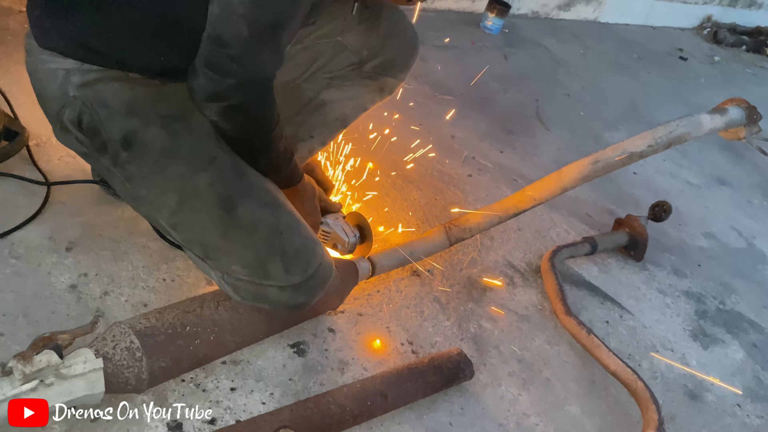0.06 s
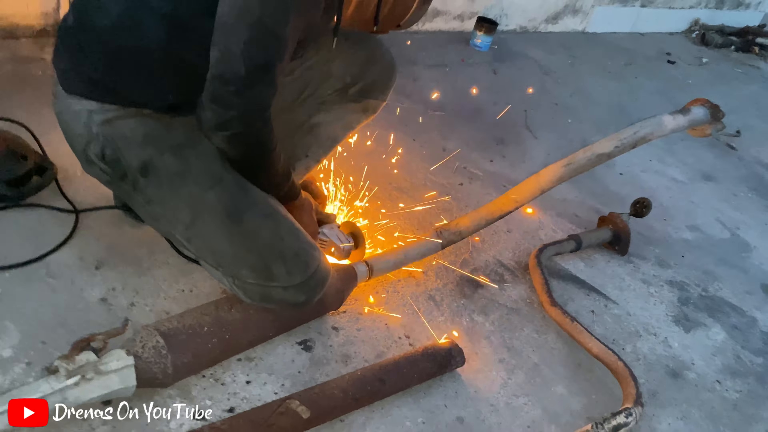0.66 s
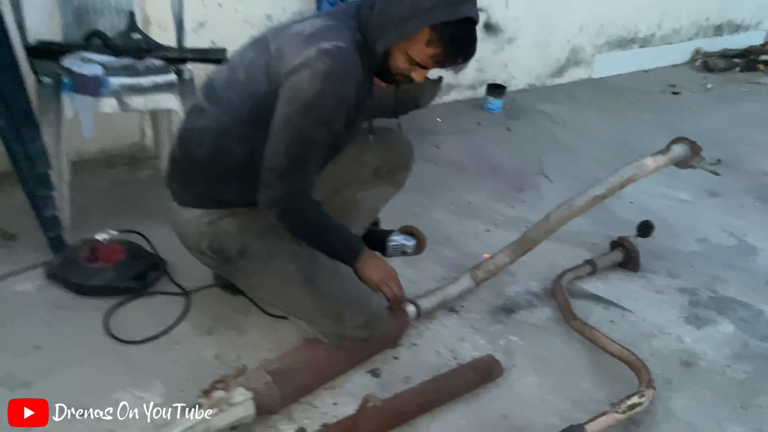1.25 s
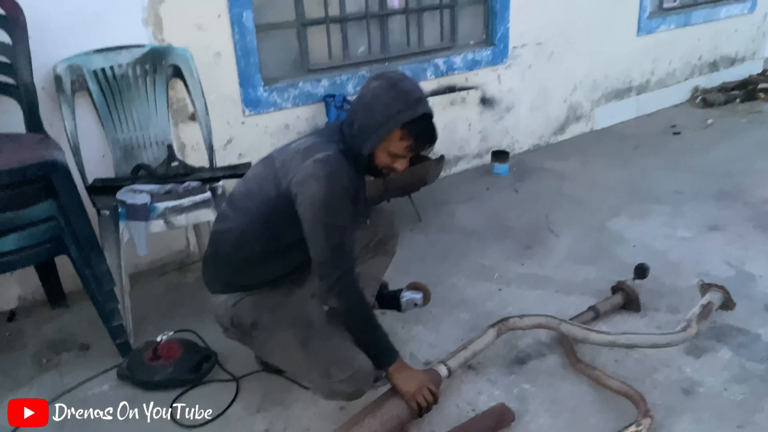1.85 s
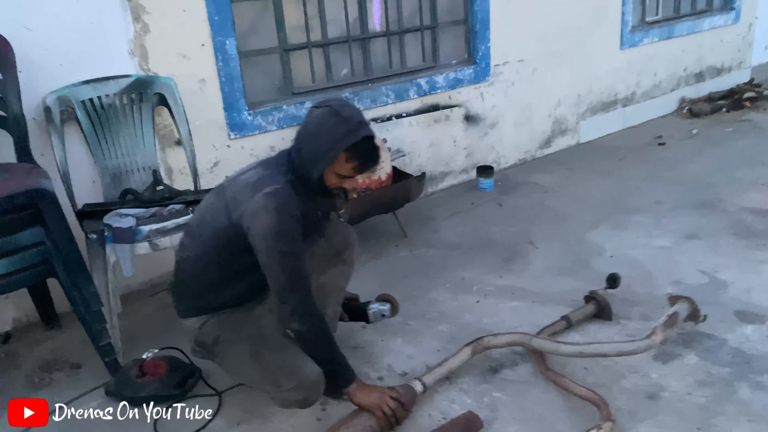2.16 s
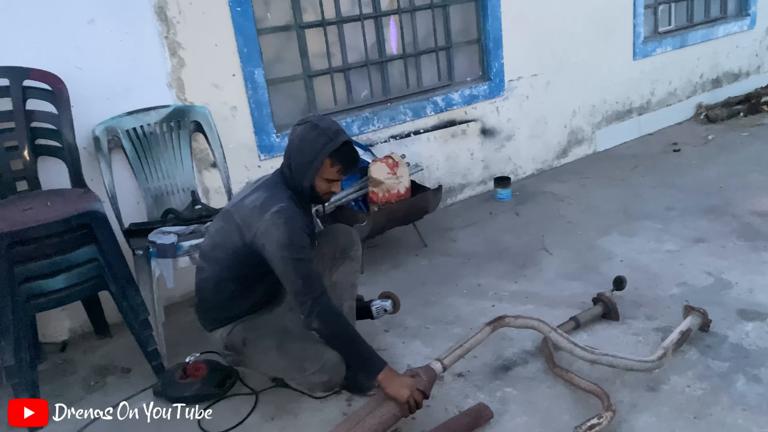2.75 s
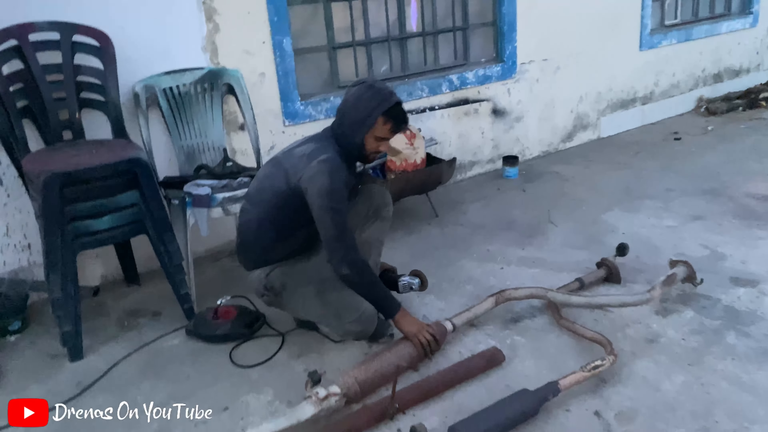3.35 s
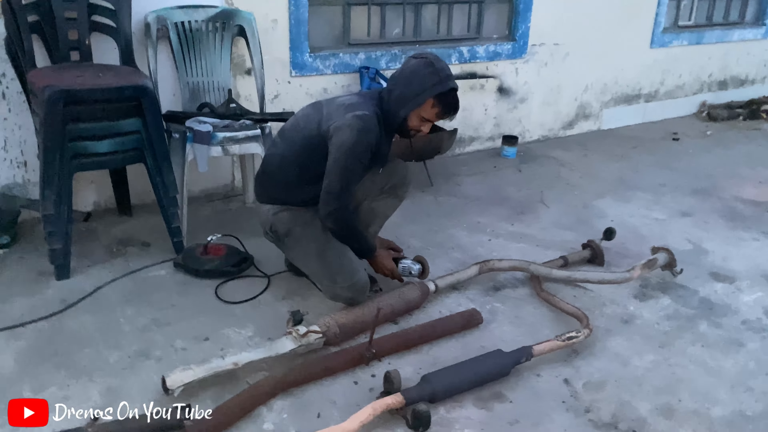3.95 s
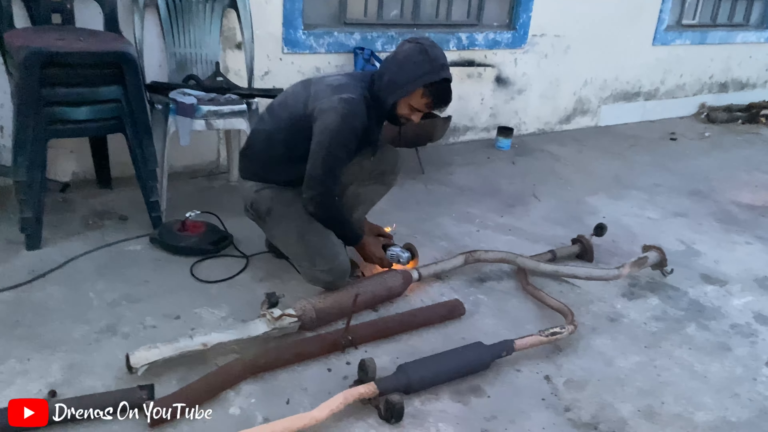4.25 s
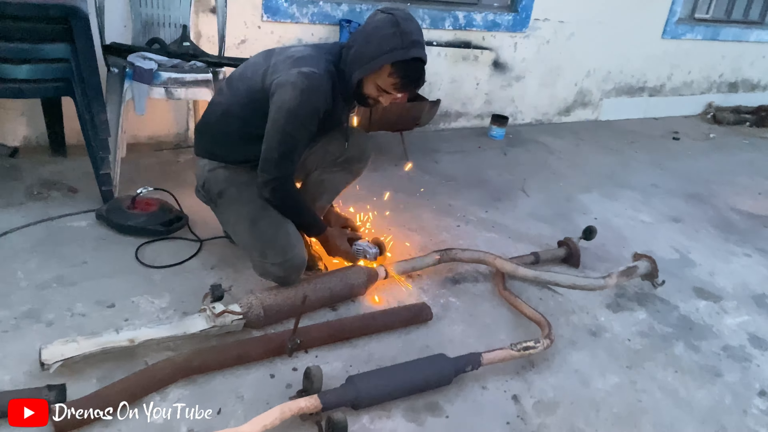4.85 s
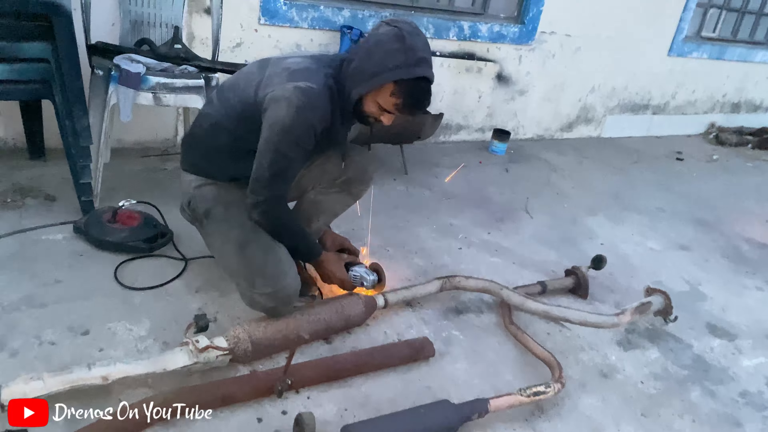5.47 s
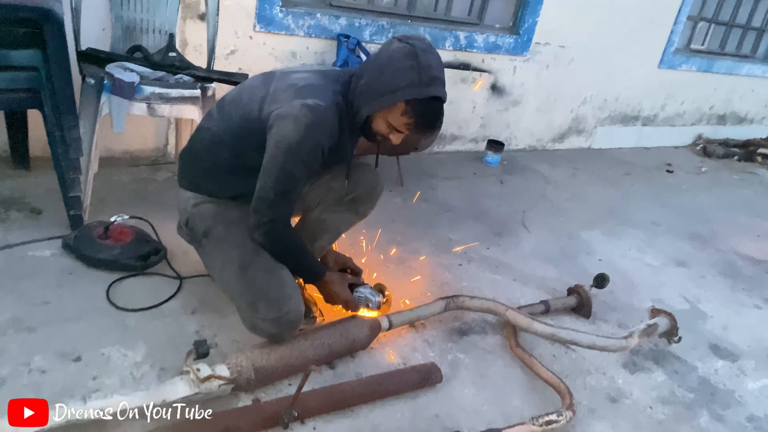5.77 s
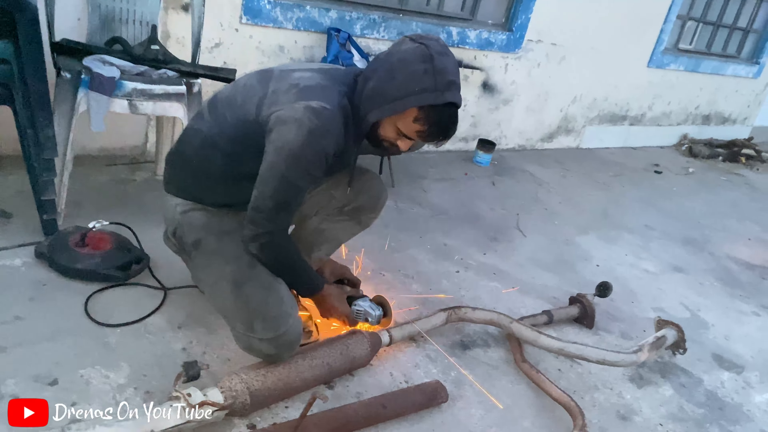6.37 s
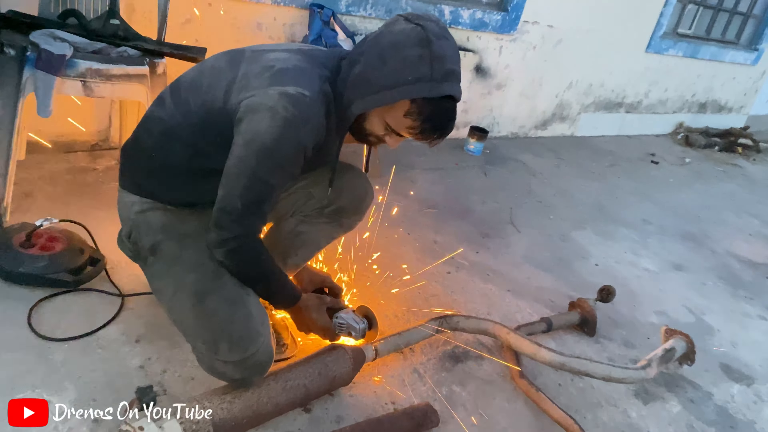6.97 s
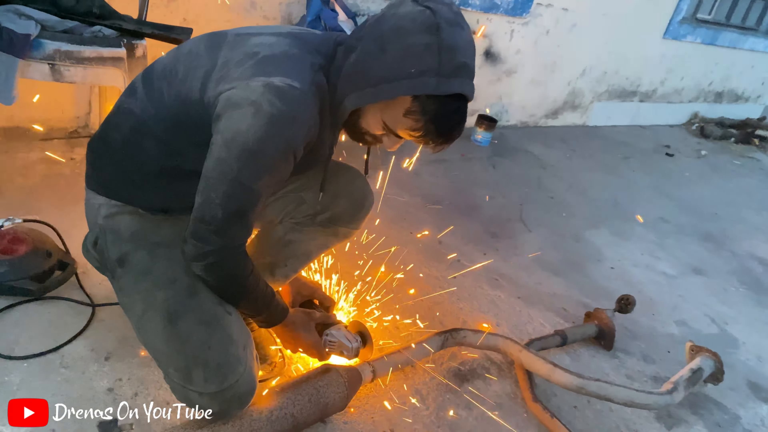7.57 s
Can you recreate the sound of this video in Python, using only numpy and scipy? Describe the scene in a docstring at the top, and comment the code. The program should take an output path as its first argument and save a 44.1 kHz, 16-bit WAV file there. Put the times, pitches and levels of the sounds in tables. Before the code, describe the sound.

An angle grinder rasps into a steel pipe with a hiss of sparks, then lifts off and runs up to a high whine. Meanwhile the pipe scrapes over concrete with a few clinks and soft bumps. The disc grazes the metal in short, crackling bursts, then bites in hard, squealing as the motor sags. It is heard in an outdoor yard, a few steps from a hand-held phone with faint wind rumble.

```python
"""An angle grinder bites into a steel exhaust pipe, its grit ringing the metal under a hiss of sparks.
The disc leaves the cut and the motor runs up, fan rushing and gears whining, while the pipe is dragged
round on the concrete yard and set down with clinks and soft bumps. The disc grazes the pipe twice,
then bites in again and the motor sags under the load. A hand-held phone listens a few steps away:
reflections off floor and wall shift as it moves, and light air rumbles on its microphone."""
import sys
import numpy as np
from scipy import signal
from scipy.fft import rfft, irfft, next_fast_len
from scipy.io import wavfile
from scipy.ndimage import uniform_filter1d, map_coordinates

SR = 44100
rng = np.random.default_rng(int(sys.argv[2]) if len(sys.argv) > 2 else 0)


def to_wav(s):
    """Save 16-bit WAV."""
    ch = np.atleast_2d(s).T  # columns
    pcm = np.round(np.clip(ch, -1, 1) * 32767)  # PCM
    wavfile.write(sys.argv[1], SR, pcm.astype(np.int16))


N = 336042
TIME = np.arange(N) / SR
PADDED = next_fast_len(N + SR // 4, real=True)
HZ = np.fft.rfftfreq(PADDED, 1 / SR)
GEAR_RATIO = .305  # disc turns per shaft turn
DIRECT_ONLY = np.array([[1], [0]])  # a source has two rows: direct sound and scattered sound


# Grit noise on the thin tube and beside the muffler. Each row: frequency in Hz, relative density in dB.
TUBE_SPECTRUM = [(40, -42), (120, -16), (280, -18.5), (400, -12.5), (780, -16.5), (1200, -1), (2500, 2),
                 (4300, 2), (5500, 1), (8500, -17), (11500, -18), (15000, -30.5)]
MUFFLER_SPECTRUM = [(40, -25), (130, -19.5), (220, -25.5), (450, -24), (1000, -7), (1600, -0.5), (3500, 5),
                    (5500, -1.5), (7000, -9.5), (8500, -14.5), (11500, -17), (15000, -37)]
# Modes of the steel at each place. Each row: frequency in Hz, width in Hz, height over the grit in dB.
TUBE_RESONANCES = [(364.5, 16, 28), (448, 40, 22.5), (513, 15, 20), (620, 160, 20.5), (918, 20, 23.5),
                   (1019, 20, 25.5), (1052, 16, 22), (1252, 17, 26.5), (1292, 14, 22.5), (1330, 20, 18),
                   (1452, 20, 24), (1494, 18, 19.5), (1630, 18, 19.5), (1671, 18, 28.5), (1885, 41, 12),
                   (2075, 83, 12.5), (2450, 260, 11.5), (3350, 320, 8.5), (3726, 48, 17.5)]
MUFFLER_RESONANCES = [(139, 10, 15), (332, 55, 23.5), (459.5, 14.6, 31.3), (634, 136, 17), (778, 12, 20.3),
                      (1211, 21, 18.5), (1460, 28, 6.8), (1861, 23, 13.7), (2240, 170, 10.7),
                      (2492, 59, 13.5), (4170, 150, 3), (6270, 450, 6.3), (7460, 200, 1.7),
                      (11030, 94, 5.6)]
# The disc's periodic thrust. Each row: multiple of the disc rate, relative level in dB.
THRUST_HARMONICS = [(1, -29), (2, -32), (3, -29), (4, -34), (5, -17), (6, -26.5), (8, -20.5)]

def cut(angle, stroke, spectrum, modes, grind_db, hiss_db, thrust_db, split_hz=4800, skid_rad=0.41):
    """Forced vibration: grit drives the pipe's modes, with thrust buzzing below and sparks hissing above."""
    grind, hiss, chatter_db = stroke
    steel = resonator(spectrum, modes)
    lowpass = 1 / (1 + (HZ / split_hz) ** 10)
    disc_angle = GEAR_RATIO * angle + skid_rad * wobble(30)
    force = contact_force(disc_angle, chatter_db)
    grinding = unit(filtered(grit(grain_db=0) * force, steel * lowpass))
    sparks = unit(filtered(grit(grain_db=2.5) * force, steel * (1 - lowpass)))
    buzz = partials(disc_angle, THRUST_HARMONICS, flutter_db=3.7, flutter_rate=20)
    return grind * (amp(grind_db) * grinding + amp(thrust_db) * buzz) + hiss * amp(hiss_db) * sparks


# Strokes of the disc at each place. Each row: touch, lift-off, time to bite in and time to ease off
# in seconds, then relative levels of grinding, spark hiss and the flare at lift-off in dB.
TUBE_STROKES = [(-0.33, 0.96, 0.5, 0.22, -21.5, -32, -35.5)]
MUFFLER_STROKES = [(4.5, 4.66, .06, 0.094, -45, -37.5, -55),
                   (4.63, 4.972, 0.15, 0.072, -32.5, -39.5, -34.5),
                   (5.36, 5.965, 0.22, 0.032, -32, -37, -33), (6.03, 7.9, 1.02, .1, -20.5, -26.5, -60)]

def strokes(rows, kerf_after_s=1.05, sink_s=0.4, kerf_db=-5.5, trail_db=-10.5, trail_s=0.27):
    """Abrasion follows pressure: each stroke sets the grinding gain, hiss gain and chatter depth in dB."""
    grind, hiss, chatter_db = np.zeros((3, N))
    parting_s = 0.019
    for touch, lift, bite, ease, grind_db, hiss_db, flare_db in rows:
        bitten = ramp((TIME - touch) / bite)
        pressure = bitten * ramp((lift - TIME) / ease)
        sunk = ramp((TIME - touch - kerf_after_s) / sink_s)  # a sunken disc throws fewer sparks clear
        grind += pressure * amp(grind_db)
        # Sparks flare just before lift-off and leave a trail in the air.
        flare = bell(lift - 0.046, 0.051) * ramp((lift - TIME) / parting_s)
        trail = amp(trail_db) * (TIME > lift - parting_s) * np.exp(-np.abs(TIME - lift) / trail_s)
        hiss += pressure ** 0.81 * amp(hiss_db + kerf_db * sunk) + amp(flare_db) * (flare + trail)
        # The disc hammers more when skimming or bound in the kerf.
        chatter_db += (pressure > 0) * (.5 + 3.5 * (1 - bitten) + 2.5 * sunk)
    return grind, hiss, chatter_db


def contact_force(disc_angle, chatter_db, snag_share=.1, snag_db=6.5, rough_db=2.0, sway_db=0.83):
    """Amplitude modulation: force peaks as the disc's high spot comes round, and on some turns it snags."""
    high_spot = np.cos(disc_angle) + 0.28 * np.cos(2 * disc_angle)
    turn = np.abs(np.round(disc_angle / (2 * np.pi))).astype(int)
    snags = (rng.random(N)[turn] < snag_share) * np.exp(6 * (np.cos(disc_angle) - 1))
    force = amp(chatter_db * high_spot + snag_db * snags + rough_db * np.tanh(wobble(190)))
    running_rms = np.sqrt(np.abs(uniform_filter1d(force ** 2, size=SR // 12)))
    return force / running_rms * amp(sway_db * wobble(30))


# The disc sets the cut edge squealing. Each row: peak time in seconds, level in dB,
# frequency and width in Hz, half-length in seconds, glide in Hz per second, pulsing in dB.
EDGE_SQUEALS = [(.69, -32, 3720, 110, .07, 700, 4), (.885, -30, 3660, 170, .03, 900, 6),
                (.935, -31, 3720, 230, .014, 0, 9), (.97, -43, 3720, 260, .05, 0, 5),
                (4.79, -35, 1560, 200, .047, 0, 4), (4.86, -33, 3600, 367, .025, 0, 6),
                (5.7, -29, 2270, 280, .056, 0, 4), (5.69, -47, 10750, 250, .04, 0, 8),
                (5.9, -34, 6400, 300, .04, -1500, 3), (6.555, -26.5, 2480, 110, .011, 0, 3),
                (6.72, -32, 2470, 110, .08, 0, 2), (6.79, -32, 1650, 160, .04, 0, 3),
                (6.8, -34, 5900, 300, .15, -1100, 3), (6.99, -26, 2370, 200, .12, 0, 2),
                (7.005, -23, 2320, 190, .03, 0, 3), (7.14, -26.5, 2380, 220, .025, 0, 4),
                (7.12, -26.5, 4200, 260, .018, -400, 7), (7.24, -28.5, 4200, 300, .04, -400, 8),
                (7.42, -29.5, 4100, 260, .035, -600, 9), (7.57, -30.5, 4000, 260, .03, -600, 9),
                (7.388, -24, 3380, 120, .005, 0, 3), (7.3, -33, 3450, 180, .035, -400, 7),
                (7.59, -30, 3330, 160, .035, -400, 8)]
# Narrow bands swell and glide in the motor's rush as reflections shift. Each row: as for the squeals.
RUSH_BANDS = [(1.25, -49, 1230, 70, .09, 250, 1), (1.53, -46.5, 2580, 130, .08, 0, 1),
              (2.2, -41.5, 2660, 140, .09, 600, 1), (2.85, -43, 3450, 180, .2, 100, 1),
              (3.95, -41.5, 2490, 150, .13, 0, 1), (4.15, -45, 5180, 200, .15, -1300, 1),
              (4.24, -39, 2760, 170, .08, -500, 1), (4.3, -40, 3760, 330, .11, -900, 1),
              (5.1, -39, 3200, 200, .15, -200, 1), (5.35, -39.5, 2580, 160, .24, 0, 1),
              (6.2, -39, 3520, 180, .12, -700, 1)]

def singing(rows, angle):
    """Narrow-band noise has a wavering pitch: each band swells, glides and pulses once per disc turn."""
    out = np.zeros((2, N))
    for s, db, hz, width_hz, length, glide, pulse_db in rows:
        near = np.abs(TIME - s) < 4 * length
        t = TIME[near] - s
        lowpass = signal.butter(2, width_hz / 2, fs=SR, output="sos")
        waver = signal.sosfilt(lowpass, rng.standard_normal((2, 2, 2 * SR)))
        in_phase, quadrature = unit(waver)[..., -len(t):]
        phase = 2 * np.pi * (hz * t + glide * t ** 2 / 2)
        band = in_phase * np.cos(phase) + quadrature * np.sin(phase)
        pulses = unit(amp(pulse_db * np.cos(GEAR_RATIO * angle[near])))
        out[:, near] += amp(db) * bell(s, length)[near] * pulses * band
    return out


# The rim catches hard on the steel. Each row: start in seconds, relative level in dB.
RIM_CATCHES = [(.768, -20), (0.78, -19), (0.791, -21), (1.01, -34), (1.028, -31), (4.179, -26),
               (4.567, -26), (4.719, -22.5), (4.7992, -17.5), (4.866, -21), (4.9004, -18), (5.482, -26),
               (5.514, -24), (5.5512, -19.5), (5.6056, -21), (5.6391, -21), (5.722, -20), (5.7884, -25),
               (5.89, -22), (6.949, -17), (7.109, -20), (7.128, -17.5), (7.208, -16.5), (7.224, -20),
               (7.277, -18)]
# Colour of a catch. Each row: frequency in Hz, relative density in dB.
CATCH_SPECTRUM = [(40, -43), (900, -17), (2000, -1.5), (4200, -1), (5200, -12), (8000, -14), (15000, -30)]
# Modes of the cut edge. Each row: frequency in Hz, width in Hz, height in dB.
EDGE_RESONANCES = [(2580, 300, 4), (3350, 200, 5), (3760, 660, 7)]

def catches(gain_db=2, decay_s=0.0027):
    """Impulse excitation: each catch is a crack of a few milliseconds that rings the cut edge."""
    bursts, t = np.zeros(N + SR), TIME[:SR // 32]
    for s, db in RIM_CATCHES:
        bursts[round(s * SR):][:len(t)] += amp(db) * np.exp(-t / decay_s)
    edge = resonator(CATCH_SPECTRUM, EDGE_RESONANCES)
    edge /= np.sqrt(np.mean(np.abs(edge) ** 2))
    return amp(gain_db) * filtered(bursts[:N] * rng.standard_normal((2, N)), edge)


# Loudness of fan and gears. Each row: time in seconds, relative level in dB.
MOTOR_LEVEL = [(1.05, -42.5), (1.3, -42.5), (1.46, -40.5), (2.08, -38), (2.84, -38), (3.44, -38.5),
               (4.02, -35.5), (4.69, -34), (5.47, -34), (5.68, -31), (5.78, -30.5), (5.93, -32.5),
               (6.2, -32.5)]
# Rush of the cooling fan. Each row: frequency in Hz, relative density in dB.
FAN_SPECTRUM = [(40, -20.5), (130, -20.5), (250, -13.5), (400, -12.5), (700, -11.5), (1100, -0.5),
                (2000, 2), (3000, 1), (4300, -3), (5200, -7), (7000, -15.5), (8800, -24), (11500, -23.5),
                (15000, -38)]
# Resonance of the casing. Each row: frequency in Hz, width in Hz, height over the rush in dB.
CASING_RESONANCE = [(5220, 200, 2)]
# Tones of the drive. Each row: multiple of the shaft rate, relative level in dB.
SHAFT_ORDERS = [(.8, -40), (1, -26), (2, -28.5), (3, -20), (15, -40), (31, -40)]
# The tones beam toward the phone or away as the tool turns. Each row: time in seconds, gain in dB.
DIRECTIVITY = [(1, 1), (1.5, 4.5), (2.2, 6), (3.1, -1.5), (3.8, -10), (4.4, 1.5), (4.9, 4.5), (6, -0.5),
               (6.85, 7), (7.62, 2)]

def motor(angle, load, rush_db=3, whine_db=3, strain_db=0.5, mains_hz=50):
    """Rotating machine noise: shaft orders whine over a rush modulated by gear rattle and torque ripple."""
    ripple_db = 0.55 * np.cos(2 * np.pi * 2 * mains_hz * TIME)
    rattle = amp(0.86 * wobble(220) + 0.1 * np.cos(GEAR_RATIO * angle) + ripple_db + 0.83 * wobble(20.94))
    rush = unit(filtered(grit(grain_db=0.5) * rattle, resonator(FAN_SPECTRUM, CASING_RESONANCE)))
    whine = partials(angle, SHAFT_ORDERS, flutter_db=2, flutter_rate=12)
    level = amp(curves(MOTOR_LEVEL)[0] + strain_db * load)
    return level * (amp(rush_db) * rush + amp(whine_db + curves(DIRECTIVITY)[0]) * whine)


# The motor sags in the cuts and runs up between. Each row: time in seconds, shaft turns per second.
SHAFT_SPEED = [(0, 386), (.3, 347), (.6, 440), (.98, 355), (1.15, 410), (1.42, 451), (1.75, 478),
               (2.35, 501), (3.2, 509), (4.72, 509), (4.9, 484), (5, 493), (5.45, 504), (5.94, 488),
               (6.25, 496), (6.6, 487), (6.98, 434), (7.25, 386)]

def shaft_angle(waver=0.00083):
    """Phase is the integral of frequency: the slightly wavering speed sums to an angle in radians."""
    speed = curves(SHAFT_SPEED)[0] * (1 + waver * wobble(14))
    return 2 * np.pi * np.cumsum(speed) / SR


# Shoves of the pipe over the concrete. Each row: start in seconds, length in seconds, level in dB.
SHOVES = [(1.833, .12, -31.5), (1.872, 0.033, -22), (2.009, 0.081, -31), (2.122, 0.1, -38),
          (2.38, 0.13, -35.5), (3.06, 0.039, -37.5)]
# Colour of the scrape. Each row: frequency in Hz, relative density in dB.
SCRAPE_SPECTRUM = [(40, -23), (150, -17), (500, -8.5), (900, -3.5), (1400, 2), (2400, -5), (4000, -8.5),
                   (7000, -20.5), (12000, -35), (15000, -48)]
# Modes of the dragged pipe. Each row: frequency in Hz, width in Hz, height over the scrape in dB.
PIPE_RESONANCES = [(1040, 21, 8), (1356, 54, 9.5), (1533, 49, 7), (1770, 56, 3), (2050, 31, 11),
                   (2320, 58, 10), (2700, 36, 8), (3140, 29, -1), (5000, 110, 14)]

def dragging(attack_s=.017, release_s=.01, slip_db=1.3):
    """Stick-slip friction: rough concrete rings the pipe as each shove rises, holds and dies away."""
    shoves = np.zeros(N)
    for s, length, db in SHOVES:
        release = np.exp(-np.maximum(TIME - s - length, 0) / release_s)
        shoves += amp(db) * ramp((TIME - s) / attack_s) * release
    slips = grit(grain_db=-3.0) * amp(slip_db * wobble(260))
    return shoves * unit(filtered(slips, resonator(SCRAPE_SPECTRUM, PIPE_RESONANCES)))


# The pipe knocks on the concrete. Each row: start in seconds, level in dB, centre of the ring in Hz.
PIPE_KNOCKS = [(1.586, -37, 1390), (2.031, -28, 2300), (2.139, -33.5, 1400), (2.201, -40, 1800),
               (3.085, -34, 1550), (3.4375, -32, 2000)]

def clinks(spread_hz=450, attack_s=0.0017):
    """Free vibration: a knock leaves the pipe's modes decaying; where it lands decides which ring most."""
    out, t = np.zeros((2, N + SR)), TIME[:SR // 4]
    for s, db, centre_hz in PIPE_KNOCKS:
        for hz, width, _ in PIPE_RESONANCES:
            envelope = np.exp(-np.pi * width * t / 2) * ramp(t / attack_s)
            ring = np.sin(2 * np.pi * (hz * t + rng.random((2, 1)))) * envelope
            out[:, round(s * SR):][:, :len(t)] += amp(db) * ring / (1 + ((hz - centre_hz) / spread_hz) ** 2)
    return out[:, :N]


# Soft bumps and shuffles of pipe and feet.
# Each row: peak time in seconds, level in dB, frequency and width in Hz, half-length in seconds.
SOFT_BUMPS = [(1.62, -53, 225, 231, 0.027), (1.775, -55, 110, 110, 0.027), (1.86, -40.5, 179, 166.5, 0.018),
              (2.06, -40.5, 210, 320, 0.033), (2.135, -42, 98, 70, 0.024), (2.515, -41, 208, 170, 0.017),
              (3.11, -51, 201, 130, 0.035), (3.46, -46, 205, 170, 0.037), (3.7, -37, 290, 220, 0.008),
              (5.65, -51, 118, 70, 0.043)]

def bumps():
    """Heavily damped resonance: each bump is a short swell of noise in one broad, low band."""
    out = np.zeros((2, N))
    for s, db, hz, width_hz, length in SOFT_BUMPS:
        near = np.abs(TIME - s) < 4 * length
        upper_hz = hz + width_hz / 2
        band = signal.butter(2, [hz * hz / upper_hz, upper_hz], "band", fs=SR, output="sos")
        noise = unit(signal.sosfilt(band, rng.standard_normal((2, SR))))[:, -near.sum():]
        out[:, near] += noise * amp(db) * bell(s, length)[near]
    return out


# Air on the microphone. Each row: frequency in Hz, relative density in dB.
WIND_SPECTRUM = [(20, -40), (32, -2), (48, -0.5), (70, 3), (130, -6.5), (250, -12), (600, -43),
                 (2000, -100)]
# Puffs of air. Each row: peak time in seconds, relative level in dB, half-length in seconds.
PUFFS = [(1.796, -51, 0.14), (2.146, -53, 0.094), (3.837, -56, 0.17), (4.755, -54.5, 0.12),
         (5.64, -49, 0.086)]

def breeze(gain_db=-2, calm_db=-60, lumps_db=2):
    """Turbulent pressure: light air rumbles on the microphone, with a few puffs."""
    rumble = unit(filtered(rng.standard_normal((2, N)), amp(over_frequency(WIND_SPECTRUM))))
    air = amp(calm_db) + sum(amp(db) * bell(s, length) for s, db, length in PUFFS)
    return rumble * air * amp(gain_db + lumps_db * wobble(16))


def yard(x, near_db=-11, near_decay_s=0.01, far_db=-19, far_decay_s=0.038):
    """Reverberation: chairs and loose pipes scatter a short tail; the walls add a faint, longer one."""
    t = TIME[:SR // 5]
    decays = np.exp(-t / np.array([[near_decay_s], [far_decay_s]])) * (t > .002)
    tails = rng.standard_normal((2, len(t))) * decays
    tail = amp([near_db, far_db]) @ (tails / np.linalg.norm(tails, axis=1, keepdims=True))
    return x + filtered(x, rfft(tail, PADDED))


# The tool's reflections as the phone moves.
# Each row: time in seconds, floor and wall lags in milliseconds, floor and wall strengths as factors.
REFLECTION_PATHS = [(1.0, 1.982, 1.663, 0.6, 0.4), (1.3, 1.764, 1.416, 0.14, 0.5),
                    (1.6, 1.401, 1.228, 0.4, 0.82), (2.0, 1.001, 1.338, 1.17, 0.55),
                    (2.4, 0.877, 1.2, 0.86, 0.9), (2.8, 0.84, 1.175, 0.7, 1.15),
                    (3.2, 0.909, 1.188, 1.01, 1.15), (3.6, 1.095, 1.166, 0.8, 0.53),
                    (3.95, 1.036, 1.238, 1.54, 0.87), (4.3, 1.103, 1.463, 1.14, 1.09),
                    (4.7, 0.991, 1.569, 0.73, 0.77), (5.2, 1.01, 1.647, 1.16, 0.94),
                    (5.7, 1.166, 1.592, 0.74, 1.13), (6.05, 1.498, 1.656, 0.78, 1.26),
                    (6.4, 1.705, 1.662, 1.02, 0.96), (6.8, 1.774, 1.593, 1.04, 0.91),
                    (7.2, 1.858, 1.613, 1.41, 1.3), (7.62, 1.955, 1.659, 1.4, 1.53)]
# Bands that each reflection lifts or hollows.
# Each row: cycles in one lag, half-width in Hz, left and right gains in dB at strength 1.
FLOOR_FRINGES = [(1.28, 147, -2.9, -2.9), (1.49, 150, 1.7, 3.4), (1.77, 103, -1.9, -0.9),
                 (2.94, 280, 2.4, 5.4), (3.69, 236, 2.3, 1.2), (4.91, 189, -1.1, -2.2),
                 (5.59, 201, 2.8, 1.2), (7.44, 154, 1.9, 1.1), (8.81, 332, 1.2, 3.0),
                 (10.35, 252, 5.5, 5.3)]
WALL_FRINGES = [(1.33, 64, 2.4, 2.4), (1.98, 82, -4.7, -3.1), (2.38, 99, 3.6, 4.1), (2.75, 183, -3.5, -6.3),
                (3.7, 223, -1.4, -3.9), (4.0, 92, 2.0, 2.4), (4.71, 173, -1.5, -1.6), (5.48, 240, 2.0, 1.6),
                (6.45, 134, -1.9, -4.6), (6.83, 293, 3.0, 4.9), (7.76, 106, 2.0, 0.8),
                (10.07, 191, -1.1, -1.9)]

def reflections(x, scatter_hz=8500):
    """Interference: peaks and dips slide with the lags off floor and wall, so the sound phases."""
    hz, t, spectra = signal.stft(x, SR, nperseg=1024)
    lift_db = np.zeros(spectra.shape)
    floor_ms, wall_ms, off_floor, off_wall = (np.interp(t, TIME, c) for c in curves(REFLECTION_PATHS))
    for lag_ms, strength, bands in ((floor_ms, off_floor, FLOOR_FRINGES), (wall_ms, off_wall, WALL_FRINGES)):
        spacing_hz = 1000 / lag_ms
        for cycles, width, *sides_db in bands:
            fringe = np.exp(-.5 * ((hz[:, None] - cycles * spacing_hz) / width) ** 2)
            lift_db += np.multiply.outer(sides_db, strength * fringe)
    lift_db /= 1 + (hz[:, None] / scatter_hz) ** 10  # rough concrete scatters the highest treble
    return signal.istft(spectra * amp(lift_db), SR, nperseg=1024)[1][:, :N]


# Likeness of the phone's two channels. Each row: frequency in Hz, coherence before clipping to 0-1.
COHERENCE = [(50, 0.1), (200, 0.45), (600, 2), (1100, 1.2), (2000, 0.12), (3000, 0.01), (5500, 0.73),
             (8000, 0.34), (9300, 1), (15000, -0.2)]
# Their balance. Each row: frequency in Hz, left minus right in dB.
BALANCE = [(100, 1), (320, -11), (600, -2), (950, 1.5), (1500, -4.5), (2500, -4), (3400, -0.5), (4300, -3),
           (6200, -0.5), (15000, 0)]
# Phase shift of the housing. Each row: frequency in Hz, further lead of the left channel in radians.
HOUSING_PHASE = [(20, 0.17), (80, -2.1), (430, 1.37), (1050, 0.2), (2000, 0.71), (2600, 0.6), (3500, 0.55),
                 (5000, 0.59)]

def microphones(x, right_lag_ms=0.2633):
    """Partial coherence: direct sound feeds both channels alike, scattered sound with opposite signs."""
    alike = np.clip(over_frequency(COHERENCE), 0, .999)
    direct, scattered = filtered(x, np.sqrt([(1 + alike) / 2, (1 - alike) / 2]))
    sides = np.array([[1], [-1]])
    gain = amp(sides * over_frequency(BALANCE) / 2)
    gain /= np.sqrt(np.mean(gain ** 2, axis=0))
    lead = 2 * np.pi * HZ * right_lag_ms / 1000 + over_frequency(HOUSING_PHASE)
    return filtered(direct + sides * scattered, gain * np.exp(.5j * sides * lead))


def resonator(spectrum, modes):
    """Resonance: peaks on a broad colour, in minimum phase so that they ring only after being struck."""
    peaks = 1 + sum(amp(db) ** 2 / (1 + (2 * (HZ - hz) / width) ** 2) for hz, width, db in modes)
    gain = amp(over_frequency(spectrum)) * np.sqrt(peaks)
    cepstrum = irfft(np.log(np.maximum(gain, 1e-6)), PADDED)
    cepstrum[1:PADDED // 2] *= 2
    cepstrum[PADDED // 2 + 1:] = 0
    return np.exp(rfft(cepstrum))


def partials(angle, orders, flutter_db, flutter_rate):
    """Superposition: fluttering tones at multiples of a rotation rate, as direct sound."""
    return DIRECT_ONLY * sum(amp(db + flutter_db * wobble(flutter_rate)) * np.sqrt(2) * np.sin(order * angle)
                             for order, db in orders)


def grit(grain_db):
    """Tiny impacts of uneven size merge into noise of rms 1, one row direct and one scattered."""
    return unit(rng.standard_normal((2, N)) * amp(grain_db * wobble(1500)))


def amp(db):
    """Decibels to gain."""
    return 10 ** (np.asarray(db) / 20)


def unit(x):
    """Scale to rms 1."""
    return x / np.sqrt(np.mean(x ** 2) + 1e-20)


def over_frequency(points):
    """(Hz, value) points joined on a log axis."""
    hz, value = np.transpose(points)
    return np.interp(np.log(HZ + 1), np.log(hz + 1), value)


def curves(rows):
    """One value per sample for each column after the time."""
    s, *columns = np.transpose(rows)
    return [np.interp(TIME, s, c) for c in columns]


def wobble(rate):
    """A smooth random curve with rate knots a second."""
    return map_coordinates(rng.standard_normal(int(N * rate / SR) + 4), [TIME * rate])


def filtered(x, response):
    """Convolution: the spectrum of x times a frequency response."""
    return irfft(rfft(x, PADDED) * response, PADDED)[..., :N]


def ramp(u):
    """A smooth rise from 0 to 1 as u goes from 0 to 1."""
    return np.sin(np.pi / 2 * np.clip(u, 0, 1)) ** 2


def bell(s, length):
    """A Gaussian swell of height 1 round the time s."""
    return np.exp(-.5 * ((TIME - s) / length) ** 2)


def scene():
    """Coupled sources: one shaft drives the motor noise and both cuts; the cuts load the gears."""
    angle = shaft_angle()
    on_tube, on_muffler = strokes(TUBE_STROKES), strokes(MUFFLER_STROKES)
    load = on_tube[0] + on_muffler[0]
    tube = cut(angle, on_tube, TUBE_SPECTRUM, TUBE_RESONANCES, grind_db=-1.5, hiss_db=-1.5, thrust_db=-10)
    muffler = cut(angle, on_muffler, MUFFLER_SPECTRUM, MUFFLER_RESONANCES,
                  grind_db=-2, hiss_db=-0.5, thrust_db=-5)
    tool = reflections(microphones(yard(motor(angle, load / load.max()) + muffler)))
    pipe = yard(tube + singing(EDGE_SQUEALS + RUSH_BANDS, angle) + catches() + dragging() + clinks())
    return tool + microphones(pipe + bumps() + breeze())


def record(dry, low_hz=40, top_hz=15850):
    """Band limiting: the phone drops the deepest bass and keeps nothing above top_hz."""
    return filtered(dry, (HZ < top_hz) * HZ ** 4 / np.sqrt(HZ ** 8 + low_hz ** 8))


dry = scene()
out = record(dry)
to_wav(out)
```